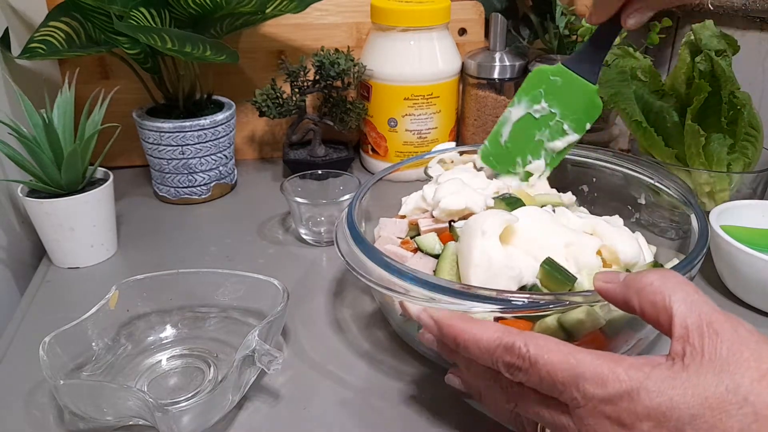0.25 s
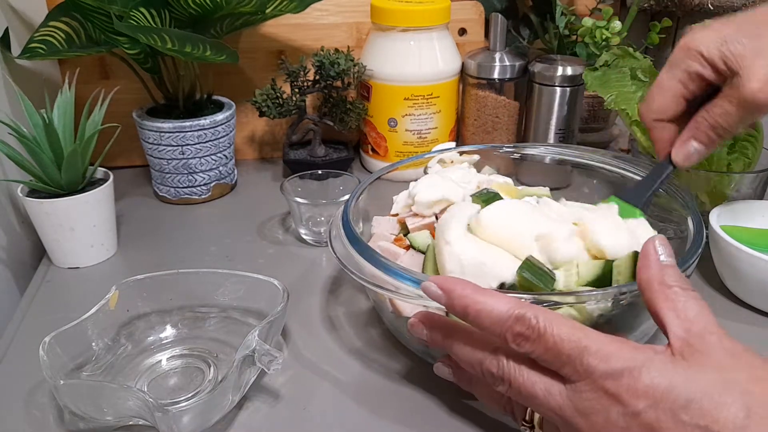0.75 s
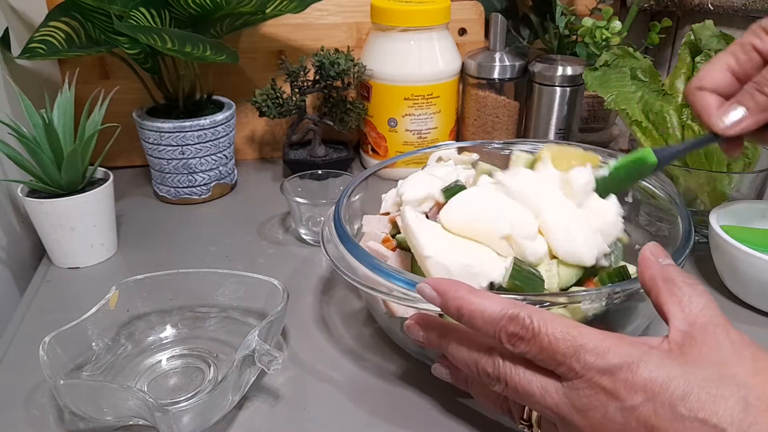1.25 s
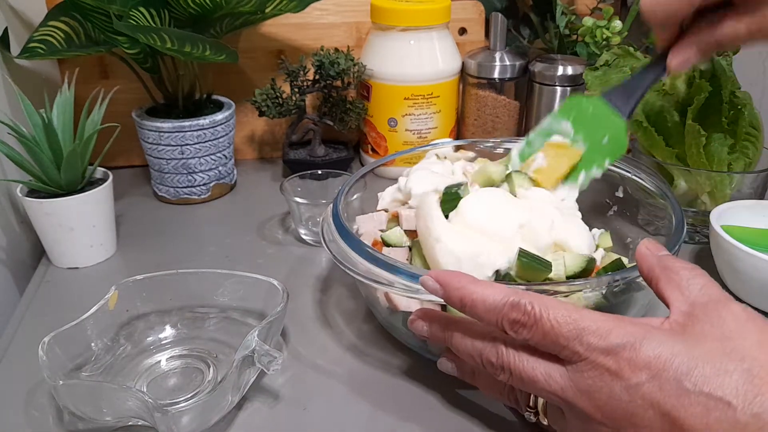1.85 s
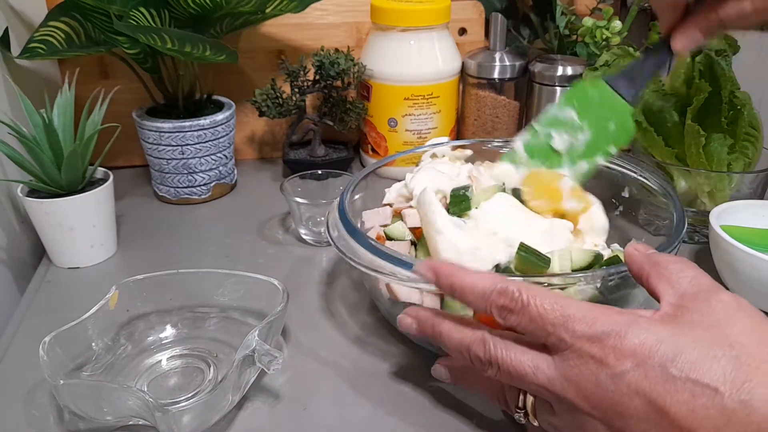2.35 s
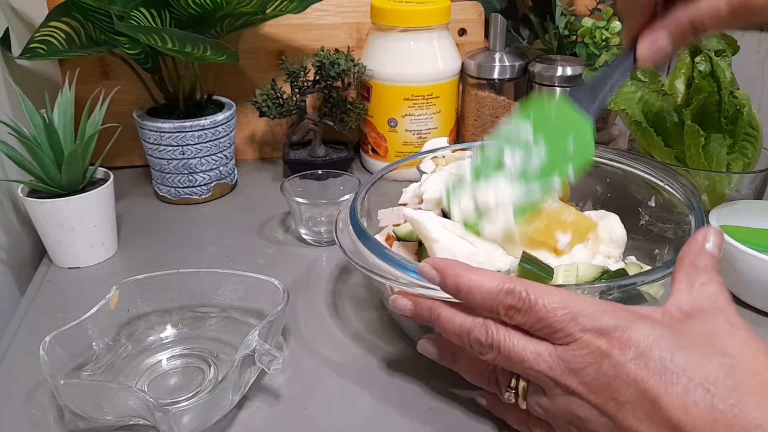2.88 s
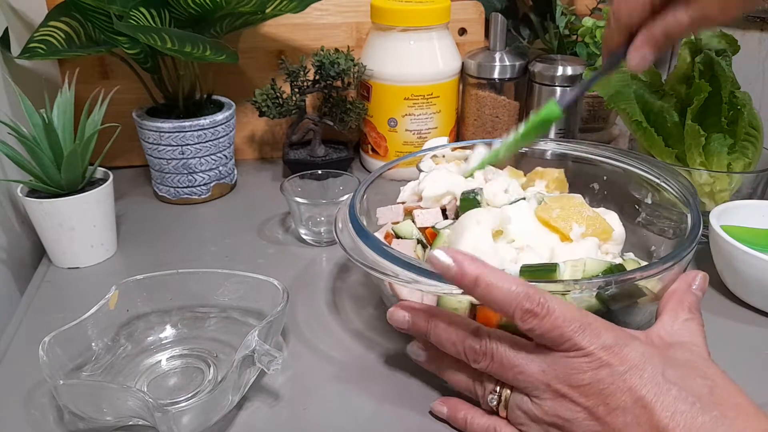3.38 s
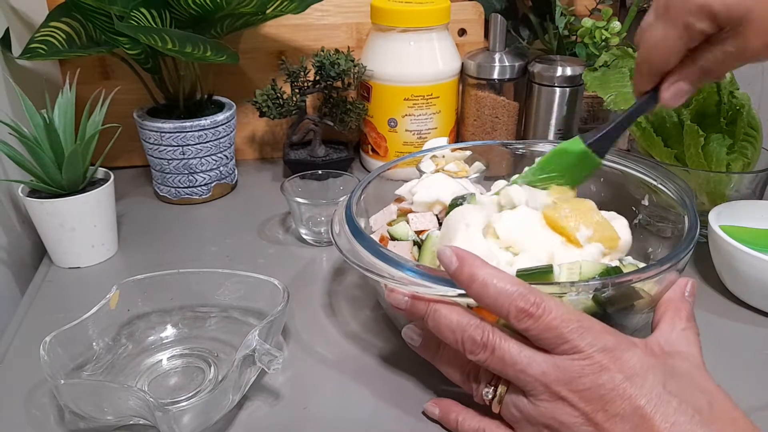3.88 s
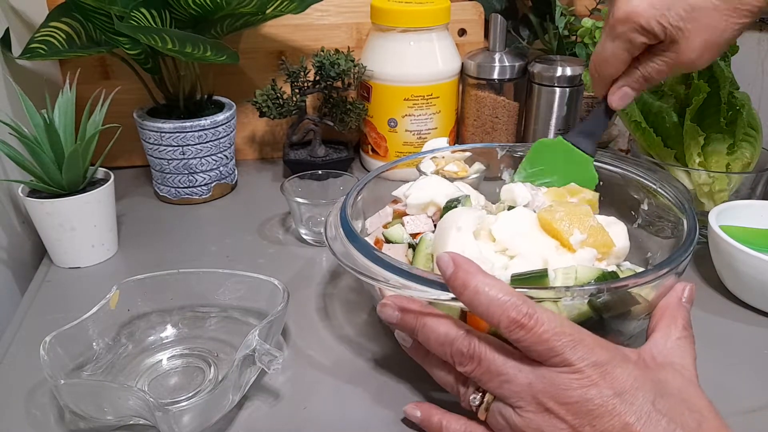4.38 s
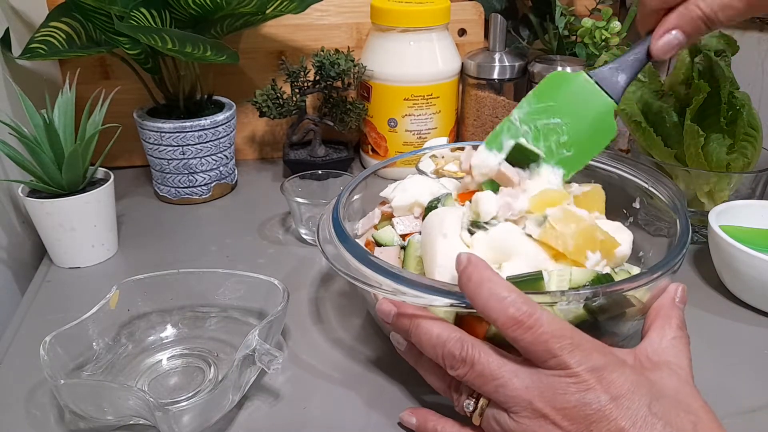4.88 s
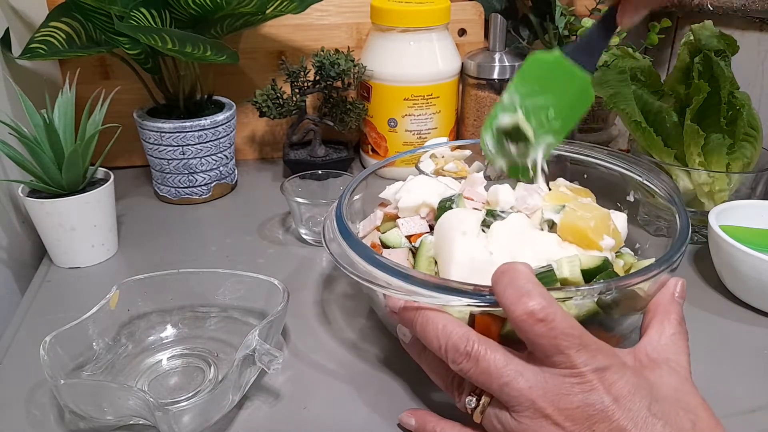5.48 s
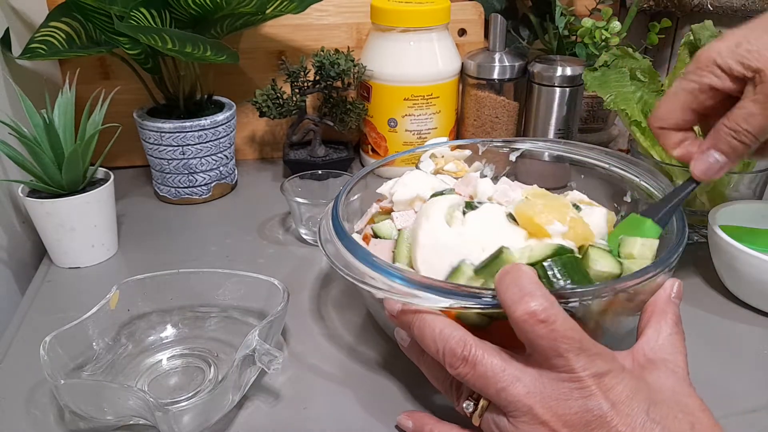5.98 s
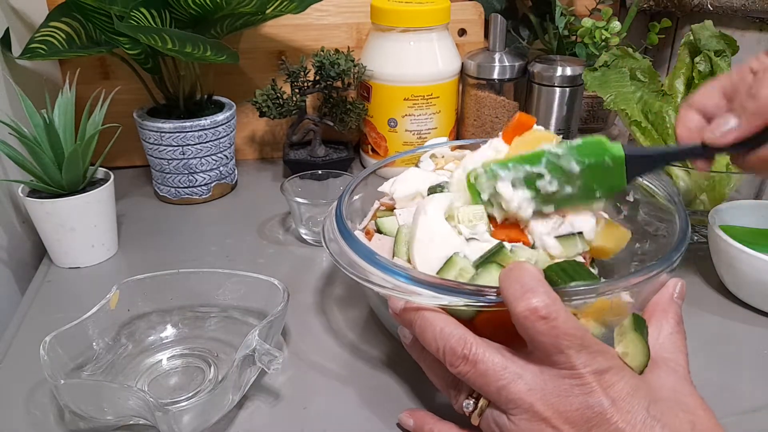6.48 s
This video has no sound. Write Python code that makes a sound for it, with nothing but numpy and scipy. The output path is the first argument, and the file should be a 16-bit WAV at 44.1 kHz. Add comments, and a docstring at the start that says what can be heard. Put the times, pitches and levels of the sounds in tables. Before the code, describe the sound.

A glass bowl knocks on a kitchen counter at 0.1 seconds and rings briefly, close to the microphone. From about 0.4 seconds a silicone spatula folds mayonnaise into diced vegetables in uneven strokes, with quiet squishes and small wet clicks throughout. The bowl thuds around 0.9 seconds, clinks lightly at 1.8, and gives its brightest ringing knock at 2.3, followed by duller bumps at 2.7 and 3.1. A quieter stretch of sticky smacks follows, until the bowl thuds again at 5 seconds and more heavily at 5.8, with a soft last bump at 6.2. The blade rubs faintly along the glass at about 0.6 and 5.8 seconds. Behind everything, an appliance hums and gently throbs over a steady low rumble in the small, hard room, lasting to the end at nearly 7 seconds.

```python
"""A glass bowl knocks on a kitchen counter and rings briefly, heard close up in stereo.
Steadied by one hand, it rocks as a silicone spatula folds mayonnaise into diced vegetables.
The cream squishes and lets go with small wet clicks, and twice the blade drags along the glass.
Further back in the small, hard room an appliance hums and throbs over a low rumble."""
import sys
import numpy as np
from scipy import signal
from scipy.io import wavfile

SR = 44100
rng = np.random.default_rng(int(sys.argv[2]) if len(sys.argv) > 2 else 0)


def dump(signal):
    """Clip the signal to [-1, 1] and save it as 16-bit WAV at the path in sys.argv[1]."""
    limited = np.clip(np.atleast_2d(signal).T, -1, 1)
    pcm = np.round(limited * 32767).astype(np.int16)
    wavfile.write(sys.argv[1], SR, pcm)


N = 297234
TIME = np.arange(N) / SR
CUTOFF_HZ = 16000

# Modes of the glass bowl. Each row: pitch in Hz, relative level in dB, t60 in seconds.
GLASS_MODES = [(1703, -4, .41), (1908, 3, .26), (2420, -19, .2), (2510, -15, .18), (2640, -16, .16),
               (3160, -15, .21), (3242, -11, .21), (3300, -14, .21), (4430, -12, .18), (4500, -10, .19),
               (4840, -7, .11), (4933, 0, .12), (6790, -17, .24), (8975, -27, .22), (10123, -11, .16),
               (10465, -18, .18), (11194, -14, .14)]
# The blade pushes through the cream. Each row: start in seconds, length in seconds, effort in dB.
BLADE_STROKES = [(0.41, 0.27, -69), (0.605, 0.19, -60), (0.892, .10, -62.5), (1.16, 0.15, -69.5),
                 (1.367, 0.12, -69), (1.654, .22, -68.5), (2.025, .16, -67.5), (2.60, 0.21, -67),
                 (2.93, .39, -66.5), (3.83, 0.23, -67), (4.253, 0.32, -67), (4.63, 0.31, -67.5),
                 (5.19, .21, -66.5), (5.592, 0.37, -63), (5.977, 0.58, -68.5)]


def from_db(db):
    """Decibels to gain."""
    return 10 ** (np.asarray(db) / 20)


def rms_one(x):
    """Scale to unit rms."""
    return x / np.sqrt(np.mean(x ** 2) + 1e-20)


def at_hz(points, hz):
    """Read a table on a log-frequency axis."""
    pitches, values = np.transpose(points)
    return np.interp(np.log(hz), np.log(pitches), values)


def add(out, start_s, sound):
    """Mix a stereo sound in at start_s."""
    at = int(round(start_s * SR))
    out[:, at:at + sound.shape[1]] += sound[:, :N - at]


def panned(db):
    """Gains that make the left side db louder than the right."""
    return from_db(np.array([[db], [-db]]) / 2)


def drift(rate_hz):
    """A smooth random wander of spread 1."""
    step, run_in = 40, 2000
    pole = np.exp(-2 * step * np.pi * rate_hz / SR)
    white = rng.standard_normal(N // step + run_in + 2)
    slow = signal.lfilter([1], [1, -2 * pole, pole * pole], white)[run_in:]
    return np.interp(np.arange(N) / step, np.arange(len(slow)), rms_one(slow))


def flutter(size, rate_hz):
    """A short stereo wobble: random points joined by lines."""
    points = rng.standard_normal((2, 128))
    return np.array([np.interp(TIME[:size] * rate_hz, np.arange(len(side)), side) for side in points])


def resonate(x, hz, width_hz):
    """A resonance with gain 1 at its peak."""
    pole, angle = np.exp(-np.pi * width_hz / SR), 2 * np.pi * min(hz, CUTOFF_HZ) / SR
    feed = np.array([1, 0, -1]) * (1 - pole * pole) / 2
    return signal.lfilter(feed, [1, -2 * pole * np.cos(angle), pole * pole], x + 1e-18)


def noise_bands(size):
    """Half-octave bands of noise, alike at both microphones in the bass and unrelated in the treble."""
    # Each row: frequency in Hz, left-right correlation.
    likeness = [(50, 0.98), (150, 0.84), (300, 0.73), (600, 0.41), (1200, 0), (3000, 0), (14000, 0)]
    edges_hz = 22 * 2 ** np.arange(0, 9.6, .5)
    white = rng.standard_normal((2, 2, size))
    for k, (low, high) in enumerate(zip(edges_hz, edges_hz[1:])):
        hz = np.sqrt(low * high)
        alike = at_hz(likeness, hz)
        bandpass = signal.butter(2, [low, high], "band", fs=SR, output="sos")
        mid, side = signal.sosfilt(bandpass, white[k % 2])
        yield hz, np.sqrt(1 + alike) * mid + np.sqrt(1 - alike) * np.array([side, -side])


def kitchen(x, wet_db, gap_s=0.0025, t60=0.3):
    """Direct sound and the dense reflections of counter and walls."""
    t = TIME[:SR // 2]
    echoes = rng.standard_normal((2, len(t))) * from_db(-60 * t / t60) * (t > gap_s)
    echoes /= np.sqrt(np.sum(echoes ** 2, axis=1, keepdims=True))
    return x + from_db(wet_db) * signal.fftconvolve(x, echoes, axes=1)[:, :N]


def room_tone(level_db=-46.5):
    """The room's steady rumble with a faint hiss."""
    # Each row: frequency in Hz, relative noise density in dB.
    spectrum = [(25, -43), (38, -32.5), (56, -1), (80, -8), (130, 10.5), (170, -21.5), (260, 3),
                (340, -16.5), (450, -16.5), (750, -20), (1200, -39.5), (2400, -37), (4000, -50),
                (8000, -52.5), (15000, -44)]
    noise = sum(band * from_db(at_hz(spectrum, hz)) for hz, band in noise_bands(N))
    return from_db(level_db) * rms_one(noise)


def appliance_hum(mains_hz=100.05, motor_hz=104.93, first_swell_s=.1):
    """Mains hum throbs against a weaker motor tone; two overtones waver in level and pitch."""
    # The drone at the third harmonic. Each row: time in seconds, level in dB.
    drone_levels = [(0.0, -46.5), (0.85, -44), (2.2, -44.5), (3.5, -48.5), (4.8, -50), (5.8, -46),
                    (6.74, -45)]
    drone_db = np.interp(TIME, *np.transpose(drone_levels))
    phase = 2 * np.pi * mains_hz * TIME
    beat = 2 * np.pi * (motor_hz - mains_hz) * (TIME - first_swell_s)
    mains = from_db(-39 + drift(12)) * np.sin(phase)
    motor = from_db(-50.5) * np.sin(phase + beat)
    near_octave = from_db(-53 + 4.3 * drift(30)) * np.sin(1.98 * phase + 1.2 * drift(4))
    drone = from_db(drone_db + 4.6 * drift(17.3)) * np.sin(3 * phase + 1.41 * drift(6.2))
    return (mains + motor) * panned(1.6) + near_octave * panned(-0.91) + drone * panned(-3.5)


def push(start_s, length_s, attack_s, release_s):
    """One movement of the blade: it speeds up, holds and dies away."""
    rise = np.clip((TIME - start_s) / attack_s, 0, 1)
    return rise * np.exp(-np.maximum(TIME - start_s - length_s, 0) / release_s)


def treble_share(hz, low_hz=1400, high_hz=5000, most=1):
    """How far a pitch depends on the hardness of the contact: 0 at low_hz, 1 at high_hz."""
    return np.clip(np.log(hz / low_hz) / np.log(high_hz / low_hz), 0, most)


def blade_rubs(damped_width_hz=40, slip_db=5):
    """The silicone edge sticks and slips; its soft contact sounds the strong lower glass modes, damped."""
    # Each row: start in seconds, length in seconds, level in dB, lift of the upper modes in dB.
    rubs = [(0.64, .16, -65, -3), (5.82, .25, -65, 2)]
    friction = rng.standard_normal((2, N)) * from_db(slip_db * drift(20))
    modes, out = [], 0
    for hz, db, _ in GLASS_MODES:
        if hz < 6000 and db > -11:
            narrow = resonate(friction, hz, damped_width_hz)
            modes.append((hz, from_db(db / 2) * resonate(narrow, hz, 10 * damped_width_hz)))
    for start, length, db, upper_db in rubs:
        glass = rms_one(sum(from_db(upper_db * treble_share(hz)) * mode for hz, mode in modes))
        out = out + from_db(db) * push(start, length, attack_s=0.057, release_s=0.028) * glass
    return out


def air_pockets(spectrum, per_s, cycles, clump_db, spread_db=2.5):
    """Tiny air pockets burst in clumps, each ringing a few cycles at its own pitch; rms 1."""
    bursts = np.flatnonzero(rng.random(N) < per_s * from_db(clump_db * drift(14)) / SR)
    size_db = spread_db * np.minimum(rng.exponential(1, len(bursts)), 3)
    sizes = from_db(size_db) * rng.standard_normal((2, len(bursts)))
    pitches = np.geomspace(spectrum[0][0], spectrum[-1][0], num=16)
    pitch_index = rng.integers(0, len(pitches), len(bursts))
    out = 0
    for k, hz in enumerate(pitches):
        clicks = np.zeros((2, N))
        clicks[:, bursts[pitch_index == k]] = sizes[:, pitch_index == k]
        out = out + from_db(at_hz(spectrum, hz)) * resonate(clicks, hz, hz / cycles)
    return rms_one(out)


def cream(settling_db=-74):
    """The sticky surface crackles and the chunks squelch with each stroke, and faintly in between."""
    # Each row of both spectra: pitch in Hz, relative level in dB.
    crackle_spectrum = [(3500, -5.5), (5000, 0), (8000, -7), (12000, 0.5), (16000, 0)]
    squelch_spectrum = [(400, 10.5), (1000, 4), (2400, 3.5), (3600, -10.5), (5200, -3.5), (9000, -47)]
    crackle = from_db(-2) * air_pockets(crackle_spectrum, per_s=2500, cycles=11, clump_db=1.5)
    squelch = from_db(-4) * air_pockets(squelch_spectrum, per_s=3000, cycles=4.8, clump_db=3)
    strokes = [from_db(db) * push(start, length, attack_s=.03, release_s=.04)
               for start, length, db in BLADE_STROKES]
    effort = np.maximum(np.max(strokes, axis=0), from_db(settling_db))
    return effort * (crackle + squelch)


def faint_smacks(per_s=4, tries=64, spread_db=1.5, spread_octaves=.3):
    """Fainter clicks come by chance while the blade moves; returns rows for smacks()."""
    moments, luck = rng.random((2, tries))
    size, pitch = np.clip(rng.standard_normal((2, tries)), -2, 2)
    rows = zip(moments * N / SR, -59 + spread_db * size, 9700 * 2 ** (spread_octaves * pitch))
    happens = luck < per_s * N / SR / tries
    return [row for row, on in zip(rows, happens)
            if on and any(0 < row[0] - start < length for start, length, _ in BLADE_STROKES)]


def smacks(gain_db=4, relative_width=0.59, snap_s=.0013, cling_s=0.016, cling_db=-17):
    """A film of cream snaps and excites the pocket behind it; smaller threads part just after."""
    # The loudest wet clicks. Each row: start in seconds, relative level in dB, pitch in Hz.
    loud_smacks = [(0.532, -56.5, 12300), (0.664, -56, 12100), (1.112, -57, 8400), (1.224, -57, 9500),
                   (2.050, -61, 8200), (2.486, -55, 8100), (2.512, -49.5, 2480), (2.657, -48, 4340),
                   (2.974, -62, 7400), (3.108, -50, 9750), (3.479, -58, 10000), (3.908, -55, 4830),
                   (4.527, -51.5, 11740), (4.694, -54.5, 11500), (4.871, -52.5, 11000),
                   (5.207, -59.5, 2330), (5.219, -55, 11600), (5.253, -50, 2050), (5.271, -52.5, 1380),
                   (5.628, -58.5, 11800), (6.346, -53.5, 13700)]
    out, t = np.zeros((2, N)), TIME[:SR // 16]
    tear = np.exp(-t / snap_s) + from_db(cling_db) * np.exp(-t / cling_s)
    films = rng.standard_normal((128, 2, len(t)))
    for (start, db, hz), film in zip(loud_smacks + faint_smacks(), films):
        width_hz = relative_width * hz
        pop = resonate(resonate(film * tear, hz, width_hz), hz, 2 * width_hz)
        onset_rms = np.std(pop[:, :SR // 500])
        add(out, start, from_db(db + gain_db) * pop / onset_rms)
    return out * panned(0.5)


def thud(hz=275, t60=0.12, rise_s=0.018):
    """The loaded bowl bounces on its base."""
    t = TIME[:SR // 2]
    pitch = hz * (1 + 0.029 * rng.standard_normal())
    envelope = from_db(-60 * t / t60) * (1 - np.exp(-t / rise_s))
    return np.ones((2, 1)) * np.sin(2 * np.pi * pitch * t) * envelope


def clack(treble_db, crack_db=3, crack_s=0.004, rise_cycles=1.85):
    """Glass meets counter: a short crack, then a dense tail whose lows build up later."""
    # Each row: frequency in Hz, relative noise density in dB.
    spectrum = [(30, -20.5), (60, 5), (180, 2), (280, 6.5), (380, -3.5), (620, 1.5), (1000, 0.5),
                (1400, 0.5), (2200, 0.5), (3500, -20), (5000, -12.5), (7500, -46.5), (10500, -12.5),
                (16000, -47)]
    # Each row: frequency in Hz, t60 of the tail in seconds.
    decay_times = [(100, 0.86), (400, 0.43), (1000, 0.38), (3000, 0.26), (12000, 0.25)]
    t, out = TIME[:SR // 3], 0
    crack = from_db(crack_db) * np.exp(-t / crack_s)
    for hz, band in noise_bands(len(t)):
        tail = from_db(-60 * t / at_hz(decay_times, hz))
        rise = 1 - np.exp(-t * hz / rise_cycles)
        gain = from_db(at_hz(spectrum, hz) + treble_db * treble_share(hz))
        out = out + band * (crack + tail) * rise * gain
    return out


def ring(modes, shape_db, stereo_rad, roughness, rise_s, sag_db=4, sag_s=0.016, spread_db=1.32):
    """Struck modes: they lose energy fast at first, waver as the bowl shifts and reach the two
    microphones out of step."""
    out = np.zeros((2, SR // 2))
    for (hz, db, t60), extra_db in zip(modes, np.broadcast_to(shape_db, len(modes))):
        t = TIME[:min(int(t60 * SR), SR // 2)]
        phase = rng.uniform(0, 2 * np.pi) + np.array([[0], [stereo_rad]]) * rng.choice([-1, 1])
        struck_db = db + extra_db + spread_db * rng.standard_normal()
        decay_db = sag_db * np.exp(-t / sag_s) - 60 * t / t60
        waver = roughness * flutter(len(t), rate_hz=100)
        tone = (1 + waver) * np.sin(2 * np.pi * hz * t + phase + waver[::-1])
        add(out, 0, from_db(struck_db + decay_db) * tone)
    return out * (1 - np.exp(-TIME[:SR // 2] / rise_s))


def bowl_knocks(hardness_db=5):
    """Each knock is a thud, a clack and two sets of modes; harder contacts carry more treble."""
    # Each row: start in seconds, then relative levels in dB of thud, clack, glass ring and treble edge,
    # then the dB by which the contact point favours the lowest glass mode over the next.
    contacts = [(0.100, -17.5, -29.5, -22, -37.5, 8), (0.623, -32.5, -49, -46, -47.5, 14),
                (0.895, -20.5, -45, -75, -57, 0), (0.917, -20.5, -39, -44.5, -58.5, -2),
                (1.003, -30, -55.5, -53, -67, 2), (1.751, -50, -34, -28, -38, -5),
                (2.162, -20, -45.5, -68, -60, 4), (2.282, -42, -25.5, -16, -23.5, 4.5),
                (2.348, -23, -26, -48, -29, -22), (2.399, -52, -38, -46.5, -41, -11),
                (2.712, -19, -34, -55, -43.5, 1), (3.058, -26, -36, -58, -57, 4),
                (3.907, -44, -55, -81, -68, -0.5), (4.004, -39, -59, -78, -46.5, 0),
                (5.017, -17, -46, -64, -52.5, 4), (5.053, -23.5, -54, -78, -76, 0),
                (5.783, -13.5, -38, -59, -33.5, 10), (5.846, -19.5, -48, -46.5, -59, -0.5),
                (6.188, -27, -54.5, -73.5, -92, 0)]
    # The loaded bowl on the counter. Each row: mode pitch in Hz, relative level in dB, t60 in seconds.
    counter_modes = [(366.2, 1, 0.27), (450.5, -3.5, 0.52), (548, -7, 0.44), (620, -5.5, 0.42),
                     (737, -5, 0.57), (820, -12.5, 0.33), (847, 0.5, 0.2), (966, 3.5, 0.07),
                     (1217, -5, 0.1), (1405, 2, 0.034)]
    knocks, rings = np.zeros((2, 2, N))
    upper = treble_share(np.array(GLASS_MODES)[:, 0], low_hz=1970, high_hz=4900, most=1.3)
    for start, thud_db, clack_db, glass_db, edge_db, lowest_db in contacts:
        add(knocks, start, from_db(thud_db - 2) * thud())
        add(knocks, start, from_db(clack_db + 2) * clack(edge_db - clack_db + hardness_db))
        counter = ring(counter_modes, shape_db=0, stereo_rad=0.68, roughness=0.73, rise_s=0.0013)
        add(knocks, start, from_db(clack_db - 8) * counter)
        shape_db = upper * min(edge_db - glass_db + hardness_db, 1)
        shape_db[:2] += [lowest_db / 2, -lowest_db / 2]
        glass = ring(GLASS_MODES, shape_db, stereo_rad=1.05, roughness=0.6, rise_s=0.00064)
        add(rings, start, from_db(glass_db - 9) * glass)
    return knocks * panned(0.36) + kitchen(rings, wet_db=-3.5) * panned(3.9)


def scene():
    """Bowl, blade and cream close to the microphones, the appliance and the room behind them."""
    bowl = bowl_knocks() + blade_rubs()
    mixture = kitchen(smacks(), wet_db=-3.5) + kitchen(cream(), wet_db=-2.5)
    return bowl + mixture + appliance_hum() + room_tone()


def record(dry):
    """The treble is cut steeply above CUTOFF_HZ."""
    return signal.sosfilt(signal.ellip(12, .1, 80, CUTOFF_HZ, fs=SR, output="sos"), dry)


dry = scene()
out = record(dry)
dump(out)
```